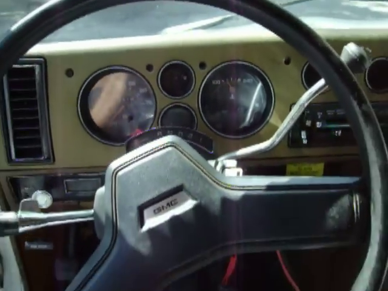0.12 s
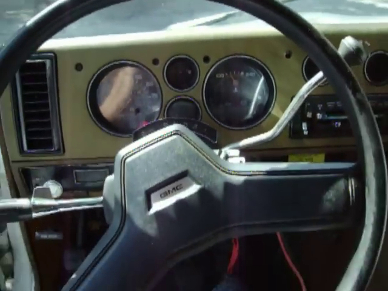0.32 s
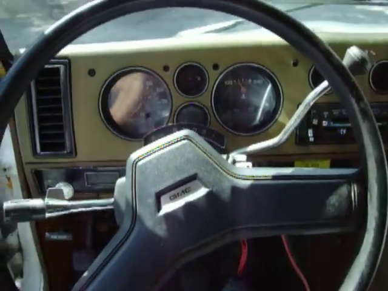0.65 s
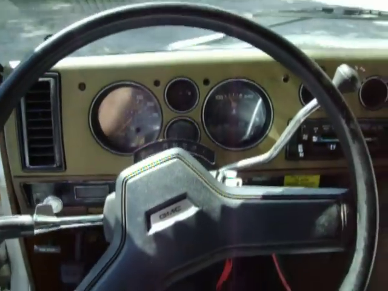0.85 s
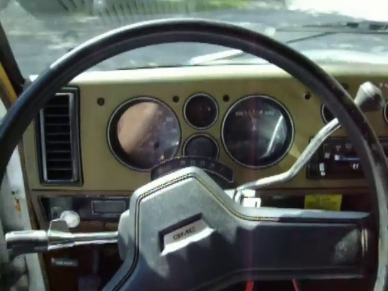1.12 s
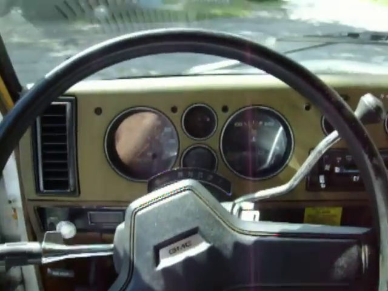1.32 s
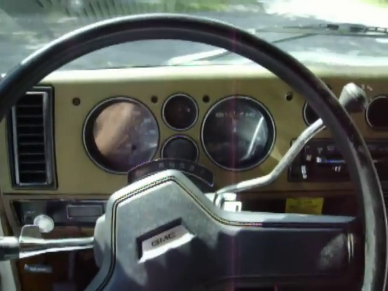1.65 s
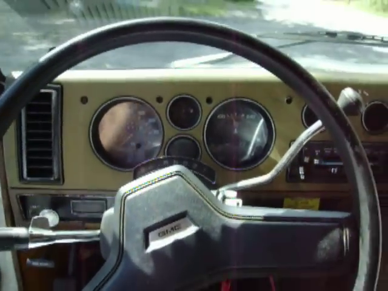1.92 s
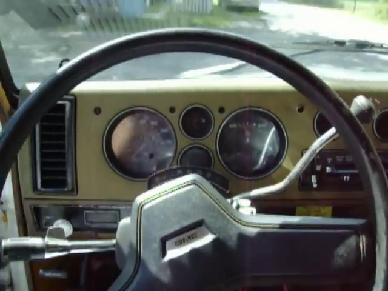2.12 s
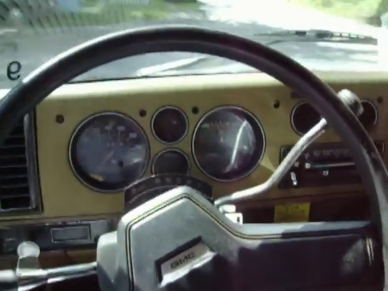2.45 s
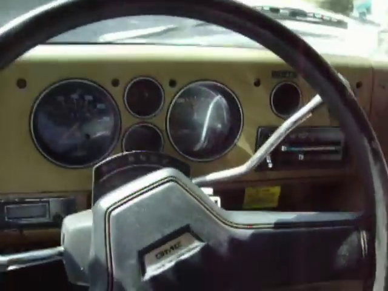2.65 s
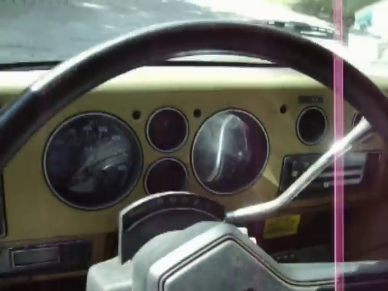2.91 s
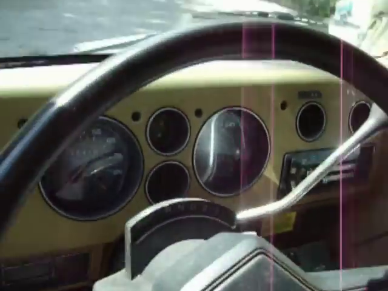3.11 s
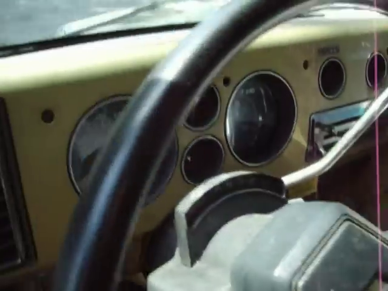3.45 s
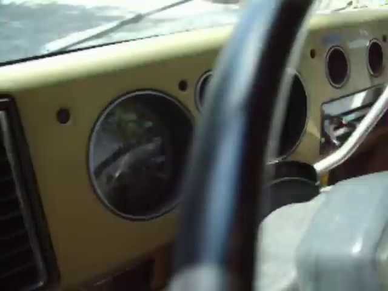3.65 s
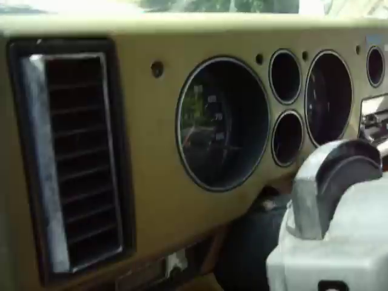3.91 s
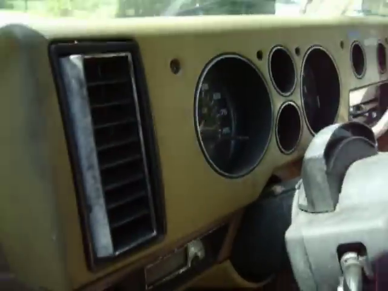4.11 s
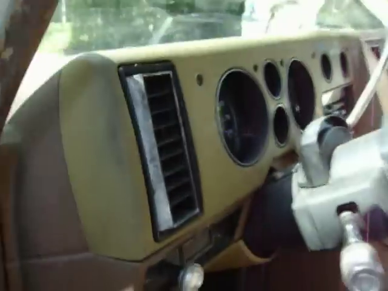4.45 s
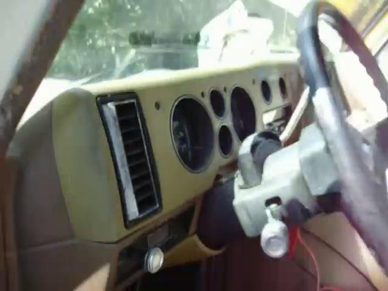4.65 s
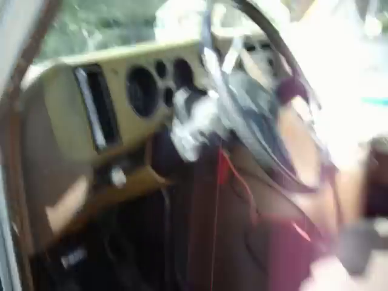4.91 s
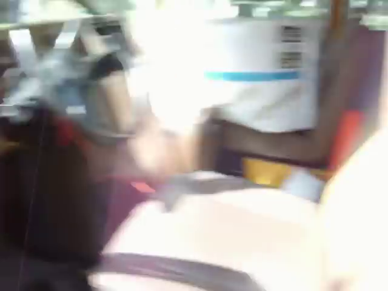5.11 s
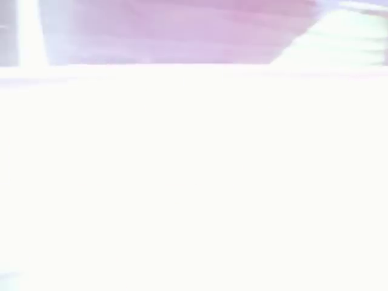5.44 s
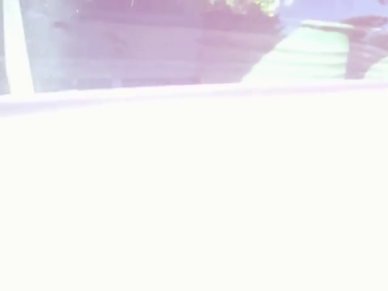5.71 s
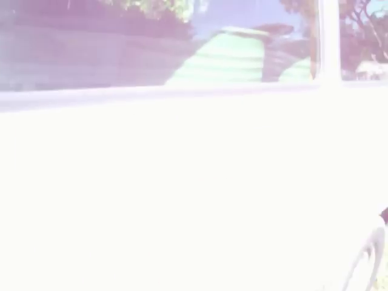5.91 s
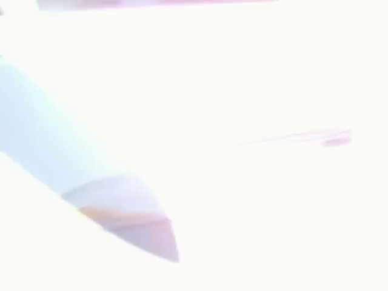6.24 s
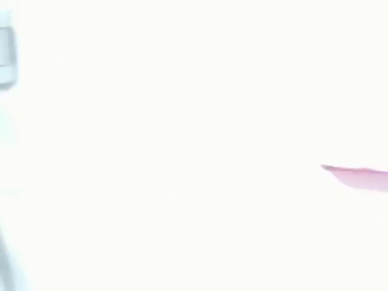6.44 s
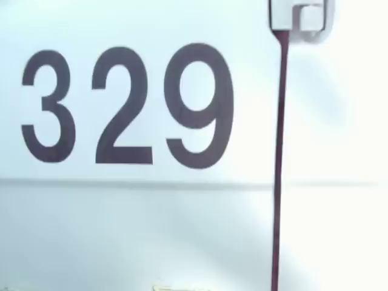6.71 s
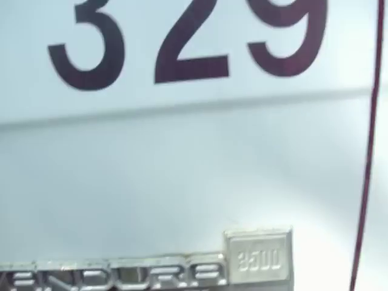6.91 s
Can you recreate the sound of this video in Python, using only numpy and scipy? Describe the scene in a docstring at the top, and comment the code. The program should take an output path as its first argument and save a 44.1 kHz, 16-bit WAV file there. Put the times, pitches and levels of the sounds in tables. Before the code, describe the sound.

A big diesel idles steadily with dense knocking, ticking valve gear and a loping low exhaust note, heard in a van cab. A loose panel buzzes briefly, hollow thumps and a tight burst of clicks interrupt. The handheld microphone moves out of the door; the clatter turns brighter, with a hard rattling bump, a short metallic scrape and a dip in level.

```python
"""A V8 diesel clatters at a cold idle over a low drone, first from a van's driver's seat, then outside its door.
Filtered noise blows make the knock and valve gear; harmonics of the firing rate make the loping exhaust note.
A loose panel buzzes in short swells of resonant noise; cab and door bump as single decaying modes.
Close clicks are short noise rings, and light metal scrapes as gritty noise through narrow resonances.
Peaks push down the camera's gain control, which creeps back up ahead of a narrow band and a clipper."""
import sys
import numpy as np
from scipy import signal
from scipy.fft import rfft, irfft, next_fast_len
from scipy.io import wavfile
from scipy.ndimage import uniform_filter1d, minimum_filter1d, map_coordinates

SR = 44100
rng = np.random.default_rng(int(sys.argv[2]) if len(sys.argv) > 2 else 0)


def dump_mix(stems):
    """Bounce the given channels to the path in sys.argv[1] as a 16-bit WAV at rate SR."""
    frames = np.atleast_2d(stems).T  # one column per channel
    limited = np.clip(frames, -1, 1)  # hard clip at full scale
    pcm = np.round(limited * 32767).astype(np.int16)
    wavfile.write(sys.argv[1], SR, pcm)


N = 311787  # samples


def amp(db):
    """Decibels to gain."""
    return 10 ** (np.asarray(db) / 20)


def unit(x):
    """Scale to rms 1."""
    return x / np.sqrt(np.mean(x ** 2) + 1e-20)


def curves(rows):
    """Draw one automation curve, sample by sample, for each column after the time."""
    t, *columns = np.transpose(rows)
    return [np.interp(np.arange(N) / SR, t, column) for column in columns]


def wobble(rate):
    """A smooth random curve with rate knots a second."""
    knots = rng.standard_normal(int(N * rate / SR) + 4)
    return map_coordinates(knots, [np.arange(N) * rate / SR])


def colour(x, spectrum):
    """Causal minimum-phase EQ through (f/Hz, level/dB) points; the result has rms 1."""
    m = 2 * next_fast_len(N // 2 + 8192)
    hz, db = np.transpose(spectrum)
    gain = amp(np.interp(np.log(np.fft.rfftfreq(m, 1 / SR) + 1), np.log(hz), db))
    # folding the cepstrum onto positive time makes the filter causal
    cepstrum = irfft(np.log(np.maximum(gain, 1e-4)))
    cepstrum[1:m // 2] *= 2
    cepstrum[m // 2 + 1:] = 0
    response = np.exp(rfft(cepstrum))
    return unit(irfft(rfft(x, m) * response)[:N])


def low_pass(x, hz):
    """A very steep low-pass."""
    m = next_fast_len(N + 8192)
    gain = 1 / np.sqrt(1 + (np.fft.rfftfreq(m, 1 / SR) / hz) ** 90)
    return irfft(rfft(x, m) * gain, m)[..., :N]


def add(track, s, sound):
    """Mix a sound into a track at time s."""
    part = track[round(s * SR):][:len(sound)]
    part += sound[:len(part)]


# the move out of the cab: (t/s, share heard from outside/0-1)
OUTSIDE_SHARE = [(0, 0), (3.8, 0.38), (4.5, 0.7), (5.2, 0.93), (7.07, 0.86)]


def outside():
    """Share of the sound heard from outside the cab."""
    return np.clip(curves(OUTSIDE_SHARE)[0], 0, 1)


def heard(x, cab, street):
    """The colour passes from that of the cab to that of the open air."""
    share = outside()
    return unit((1 - share) * colour(x, cab) + share * colour(x, street))


def level(cab_db, street_db, unrest_db):
    """A level in dB that passes from the cab to the open air and varies every few firings."""
    return cab_db + outside() * (street_db - cab_db) + unrest_db * wobble(13)


# brief dips of the engine: (t/s at the deepest, level/dB, half width/s at 1/e of the depth)
LEVEL_DIPS = [(1.49, -3.5, .035), (1.659, -2.5, .025), (1.72, -0.5, .02), (3.962, -4.5, .032),
              (4.47, -4, 0.037), (5.02, -4, 0.023), (5.75, -3, 0.041), (6.111, -4.5, 0.078),
              (6.43, -10, 0.24)]


def dips():
    """Short, smooth drops in level, in dB."""
    t = np.arange(N) / SR
    return sum(db * np.exp(-((t - s) / width) ** 2) for s, db, width in LEVEL_DIPS)


# a low drone that wavers and stops: (t/s, f/Hz, level/dB)
LOW_DRONE = [(0, 53.3, -20), (.15, 50.3, -21), (.25, 52.7, -44), (.48, 51.7, -39), (.6, 55.26, -21),
             (.78, 55.8, -26), (.88, 52.1, -19), (1, 50.3, -27), (1.15, 47.3, -80)]


def drone():
    """A low tone with its octave swells and sags beside the exhaust note."""
    hz, db = curves(LOW_DRONE)
    turn = 2 * np.pi * np.cumsum(hz) / SR
    return np.sqrt(2) * amp(db) * (np.sin(turn) + amp(-8.0) * np.sin(2 * turn))


# swells of the light metal scrape: (t/s, level/dB)
SCRAPE_SWELL = [(6.1, -70), (6.2, -26), (6.29, -21.5), (6.34, -23), (6.38, -19.5), (6.43, -26.5),
                (6.49, -24), (6.58, -56)]
# colour of the grit: (f/Hz, level/dB)
GRIT_COLOUR = [(1500, -59), (3000, -25), (3600, -13.5), (4200, -3.5), (4550, -11), (4900, -7),
               (5500, -21.5), (6200, -33.5), (9000, -37)]
# ringing modes of the scraped metal: (f/Hz, width/Hz, level/dB)
METAL_MODES = [(3570, 17, -5), (3900, 25, -15), (4280, 18, 2), (4700, 35, -5), (5340, 51, -7.5)]


def scuff():
    """A gritty scrape sets light metal ringing, each mode coming and going."""
    grit = rng.standard_normal(N) * amp(1.8 * wobble(150))
    ring = np.zeros(N)
    for hz, width, db in METAL_MODES:
        mode = unit(signal.lfilter(*signal.iirpeak(hz, hz / width, SR), grit))
        ring += amp(db + 3.5 * wobble(21)) * mode
    scrape = unit(colour(grit, GRIT_COLOUR) + amp(.5) * unit(ring))
    return amp(curves(SCRAPE_SWELL)[0]) * scrape


# swells of a loose panel: (t/s at the start, rms level/dB at the top of the swell, length/s)
PANEL_BUZZES = [(.202, -11, .035), (.255, -14.5, 0.043), (.411, -17.5, 0.13), (.64, -17.5, 0.11),
                (1.385, -15, .06), (2.274, -15, 0.049), (3.492, -12, 0.04), (4.545, -7.5, 0.044),
                (4.69, -17, 0.048), (5.349, -11.5, .04), (5.426, -12, 0.035)]


def buzzes():
    """The idle sets a loose panel buzzing: noise through its resonance in short swells."""
    out = np.zeros(N)
    mode = signal.iirpeak(1940, 5, SR)  # resonance in Hz, Q
    for s, db, length in PANEL_BUZZES:
        ring = signal.lfilter(*mode, signal.lfilter(*mode, rng.standard_normal(SR // 2)))
        swell = np.hanning(round(length * SR))
        add(out, s, amp(db) * swell * unit(ring[-len(swell):]))
    return out


# hollow bumps of the cab, the door and the steps: (t/s, peak level/dB, f/Hz, t60/s)
HOLLOW_BUMPS = [(0.409, -11.5, 363, 0.12), (0.944, -11, 146, .08), (0.983, -7.5, 224, 0.055),
                (1.636, -2.5, 162.7, 0.21), (1.676, -8, 175.4, 0.34), (1.685, -1.5, 944, .073),
                (2.023, -11.5, 134, 0.078), (3.801, -11.5, 147.5, 0.26), (3.897, -9.5, 205.5, 0.084),
                (5.85, -7, 1254, .07), (5.88, -1, 450, 0.048), (5.881, -16, 111, 0.047),
                (5.906, -5, 340, .02), (5.961, -9, 242, 0.13), (6.004, -9, 169, 0.098),
                (6.265, -12.5, 257, 0.024), (6.334, -13.5, 229, .05), (6.421, -11, 248, 0.025)]


def bumps():
    """Each bumped panel booms with one decaying mode."""
    out, t = np.zeros(N), np.arange(SR // 4) / SR
    swell_cycles = 1.05  # cycles until the swing has built up to 63 %
    for s, db, hz, t60 in HOLLOW_BUMPS:
        attack = 1 - np.exp(-(t * hz / swell_cycles) ** 2)
        ring = np.sin(2 * np.pi * hz * t) * attack * amp(-60 * t / t60)
        add(out, s, amp(db) * ring / np.abs(ring).max())
    return out


# clicks and rattles close to the microphone: (t/s, peak level/dB, f/Hz, t60/s)
CLOSE_CLICKS = [(1.6815, -0.5, 2070, 0.021), (2.537, 9.5, 3920, .0052), (2.554, 15.5, 3770, 0.01),
                (2.562, 12, 4010, .008), (2.572, 13, 3800, .0087), (2.578, 14, 3140, 0.0093),
                (5.895, 2.5, 4100, 0.13), (5.911, 5.5, 4100, .1), (5.947, 5.5, 3960, 0.043),
                (5.993, 5, 3500, 0.018), (6.046, 6, 4000, 0.023), (6.144, -1, 3870, 0.034)]


def clicks():
    """Small hard parts ring briefly; a very high crack on top mostly drives the gain control."""
    out, t = np.zeros(N), np.arange(SR // 4) / SR
    crack_db, crack_db_per_octave = -9, 8  # crack of a 3.8 kHz click; duller clicks have less
    for s, db, hz, t60 in CLOSE_CLICKS:
        attack = 1 - np.exp(-t / (0.12 * t60))  # long rattles also start softly
        burst = rng.standard_normal(len(t)) * amp(-60 * t / t60) * attack
        mode = signal.iirpeak(hz, 2.2, SR)
        ring = signal.lfilter(*mode, signal.lfilter(*mode, burst))
        knock = signal.lfilter(*signal.butter(2, 2000, fs=SR), burst)
        body = signal.lfilter(*signal.butter(6, 4800, fs=SR), ring + amp(-8) * knock)
        crack = signal.sosfilt(signal.butter(12, 9500, "high", fs=SR, output="sos"), burst)
        click = body + amp(crack_db + crack_db_per_octave * np.log2(hz / 3800)) * crack
        add(out, s, amp(db) * click / np.abs(click).max())
    return out


def blows(crank, cylinder_db, lag, rise, t60, scatter_db, jitter, loose):
    """One noise ring per firing, lag firings late: its own per cylinder, plus a loose share that never repeats."""
    t = np.arange(SR // 6) / SR
    decay = (1 - np.exp(-t / rise)) * amp(-60 * t / t60)
    firing = np.arange(int(crank[-1]))
    late, size = rng.standard_normal((400, 2))[firing].T
    on_time = np.interp(firing + lag, crank, np.arange(N))
    start = np.clip(on_time + jitter * SR * late, 0, N - 1).astype(int)
    cylinder = firing % len(cylinder_db)
    strength = amp(cylinder_db[cylinder] + scatter_db * size)
    own_ring = rng.standard_normal((len(cylinder_db), len(t)))[cylinder]
    loose_ring = rng.standard_normal((len(firing), len(t)))
    ringing = np.sqrt(1 - loose) * own_ring + np.sqrt(loose) * loose_ring
    sample = start[:, None] + np.arange(len(t))
    blow = strength[:, None] * ringing * decay
    return unit(np.bincount(sample.ravel(), blow.ravel(), N)[:N])


def lope(crank, swing_db, peak_share):
    """The uneven engine swells in dB once per round, loudest at peak_share of it."""
    return swing_db * np.cos(2 * np.pi * (crank / len(CYLINDER_BALANCE) - peak_share))


# low end along the way from the seat to the street: (t/s, body rumble level/dB, exhaust note level/dB)
LOW_END = [(0, -18, -24), (.3, -18, -24.5), (.65, -21, -31.5), (.95, -17.5, -25), (2.5, -19, -22.5),
           (3.05, -16.5, -21.5), (3.55, -17.5, -19.5), (4.0, -19.5, -24), (4.85, -22, -22.5),
           (5.45, -26, -31), (5.8, -22.5, -26.5), (6.3, -19, -30.5), (7.07, -21.5, -34.5)]
# upper exhaust tones: (multiple of the firing rate, level/dB against the octave)
EXHAUST_OVERTONES = [(3, -9), (4, -20), (6, -17)]
# body panels in the cab, outside, and their deep shudder: (f/Hz, level/dB)
PANELS_IN_CAB = [(59, -29), (100, 0), (118, -9), (140, -3), (172, -7.5), (210, 0), (246, -10.5), (348, -5),
                 (376, -6), (750, -11), (980, -42.5), (1650, -120)]
PANELS_OUTSIDE = [(59, -20), (100, -13), (113, -7), (130, -5.5), (205, -5), (242, -13.5), (261, -3),
                  (280, 0.5), (366, -10), (399, -11), (500, -10), (549, -6), (750, -19.5), (980, -37.5),
                  (1650, -120)]
DEEP_SHUDDER = [(15, -32.5), (30, -21.5), (42, -5.5), (60, -1), (80, 1), (110, -9.5), (160, -28.5),
                (400, -87)]


def exhaust(crank):
    """Each firing pushes the loping exhaust note and shakes the body panels."""
    body_db, note_db = curves(LOW_END)
    # the firing tone follows only a share of the note's changes
    firing_db = -28 + .45 * (note_db - note_db.mean()) + .8 * wobble(8)
    octave_db = note_db + 1.2 * wobble(8)
    turn = 2 * np.pi * (crank + 0.0051 * wobble(13))
    upper = np.sin(2 * turn)
    for multiple, db in EXHAUST_OVERTONES:
        phase = rng.uniform(0, 2 * np.pi)
        upper += amp(db + 2.9 * wobble(6.9)) * np.sin(multiple * turn + phase)
    tones = amp(firing_db) * np.sin(turn) + amp(octave_db) * upper
    note = np.sqrt(2) * amp(lope(crank, swing_db=2.6, peak_share=0.54)) * tones
    rumble_db = np.transpose(CYLINDER_BALANCE)[2]
    thuds = blows(crank, rumble_db, lag=0, rise=0.0011, t60=0.27, scatter_db=1.05, jitter=0.00062, loose=0.77)
    shaken = heard(thuds, PANELS_IN_CAB, PANELS_OUTSIDE) + amp(-11.0) * colour(thuds, DEEP_SHUDDER)
    dip_share = 0.68  # the low end takes only this share of a dip
    return amp(dip_share * dips()) * (note + amp(body_db) * shaken)


def engine_bay(x, wet_db, t60):
    """The steel bay rings briefly at many close frequencies: a decaying noise tail."""
    t = np.arange(SR // 5) / SR
    tail = rng.standard_normal(len(t)) * amp(-60 * t / t60)
    return x + amp(wet_db) * signal.fftconvolve(x, tail / np.linalg.norm(tail))[:N]


def patchy(x, depth_db):
    """Loose parts chatter in turn: narrow bands swell and fade for a few firings."""
    bands = signal.stft(x, nperseg=512)[2]
    field = rng.standard_normal(bands.shape)
    for _ in range(2):
        field = uniform_filter1d(field, size=3, axis=0)  # across frequency
        field = uniform_filter1d(field, size=9, axis=1)  # along time
    return unit(signal.istft(bands * amp(depth_db * unit(field)), nperseg=512)[1][:N])


# relative balance in firing order: (knock and valve level/dB, injector and slap level/dB, rumble level/dB)
CYLINDER_BALANCE = [(-1, -2, -3), (1, -8.5, -1.5), (0, -5, -2), (-1, -1, -1), (-1, -0.5, -3), (-2.5, -4, 0),
                    (-1, -3.5, -3), (-0.5, -2.5, -0.5)]
# engine block in the cab and outside: (f/Hz, level/dB)
BLOCK_IN_CAB = [(400, -21.5), (660, -8.5), (760, -3.5), (857, -2.5), (985, -5), (1050, -1.5), (1130, -2),
                (1230, -0.5), (1350, -0.5), (1620, -2.5), (2110, -28), (3500, -100)]
BLOCK_OUTSIDE = [(400, -21), (660, -6.5), (761, -4.5), (850, -4), (933, -3.5), (1040, -5.5), (1220, 2),
                 (1340, 0), (1450, 1), (1620, -4), (2110, -32), (3500, -90.5)]
# sheet metal in the cab and outside: (f/Hz, level/dB)
SHEET_IN_CAB = [(940, -26.5), (1500, -8), (1750, -5.5), (1900, 0), (2050, 1), (2230, -3.5), (2420, -8.5),
                (2750, -13.5), (3300, -15), (4290, -38), (7200, -100)]
SHEET_OUTSIDE = [(940, -26), (1600, -3.5), (1740, -11), (1870, 3), (2030, 1), (2200, -4.5), (2370, -10),
                 (2680, -8.5), (3110, -12), (4290, -32.5), (7200, -100)]
# injectors and valve gear: (f/Hz, level/dB)
VALVE_COLOUR = [(1700, -37), (2350, -8), (2650, -6.5), (3100, -7.5), (3450, -8), (3800, -3.5), (4000, 0),
                (4230, -0.5), (4600, -7), (5270, -18), (5940, -32), (7700, -58.5), (13000, -110)]


def clatter(crank):
    """Combustion knocks the block and rattles the sheet metal; injectors and valves tick in between."""
    knock_db = level(cab_db=-17.5, street_db=-18.3, unrest_db=0.56)
    sheet_db = level(cab_db=-21.5, street_db=-19.5, unrest_db=0.36)
    sheet_db += lope(crank, swing_db=0.99, peak_share=0.9)
    valve_db = level(cab_db=-22.5, street_db=-20.5, unrest_db=0.57)
    knocks, ticks, _ = np.transpose(CYLINDER_BALANCE)
    knock = blows(crank, knocks, lag=0, rise=0.0013, t60=0.2, scatter_db=1.1, jitter=.001, loose=0.73)
    slap = blows(crank, ticks, lag=.5, rise=0.0013, t60=0.063, scatter_db=3.5, jitter=.004, loose=0.75)
    injectors = blows(crank, ticks, lag=0.04937, rise=0.0011, t60=0.34, scatter_db=1.1, jitter=.0008, loose=0.8)
    valves = blows(crank, knocks, lag=.6, rise=0.0012, t60=0.077, scatter_db=2.6, jitter=.004, loose=0.63)
    shake = engine_bay(knock + amp(-7.5) * slap, wet_db=-9, t60=.1)
    block = heard(patchy(shake, depth_db=0.8), BLOCK_IN_CAB, BLOCK_OUTSIDE)
    late_shake = np.roll(shake, 70)  # the sheet metal answers 70 samples after the block
    sheet = heard(patchy(late_shake, depth_db=2.33), SHEET_IN_CAB, SHEET_OUTSIDE)
    ticking = engine_bay(injectors + amp(-4) * valves, wet_db=-14.0, t60=0.047)
    gear = colour(patchy(ticking, depth_db=0.2), VALVE_COLOUR)
    return amp(dips()) * (amp(knock_db) * block + amp(sheet_db) * sheet + amp(valve_db) * gear)


def scene():
    """The crank, counted in firings, drives the exhaust and the clatter; the rest is laid around them."""
    idle_hz, hunt_hz = 45.5, .15  # firings per second; the governor lets the speed wander
    crank = np.cumsum(idle_hz + hunt_hz * wobble(3)) / SR
    around = drone() + scuff() + buzzes() + bumps() + clicks()
    return (around + exhaust(crank) + clatter(crank))[None]


def gain_control(x, ceiling_db, release_db):
    """Peaks over the ceiling cut the gain at once; it returns by release_db each second."""
    recovery = release_db * np.arange(N) / SR
    excess = np.maximum(20 * np.log10(np.abs(x) + 1e-9) - ceiling_db, 0)
    cut = np.maximum.accumulate(excess + recovery, axis=-1) - recovery
    gain_db = uniform_filter1d(minimum_filter1d(-cut, size=36), size=36)  # rounds the gain steps
    return x * amp(gain_db)


def record(dry):
    """The camera rides its gain, keeps only a narrow band and clips the highest peaks."""
    ridden = gain_control(dry, ceiling_db=-2.5, release_db=43.5)
    held = low_pass(ridden, hz=5950)
    return low_pass(np.clip(held, -.71, .71), hz=15800)


dry = scene()
out = record(dry)
dump_mix(out)
```